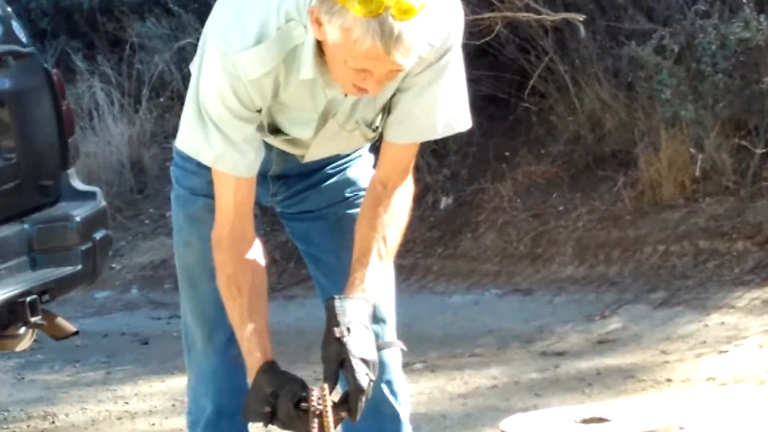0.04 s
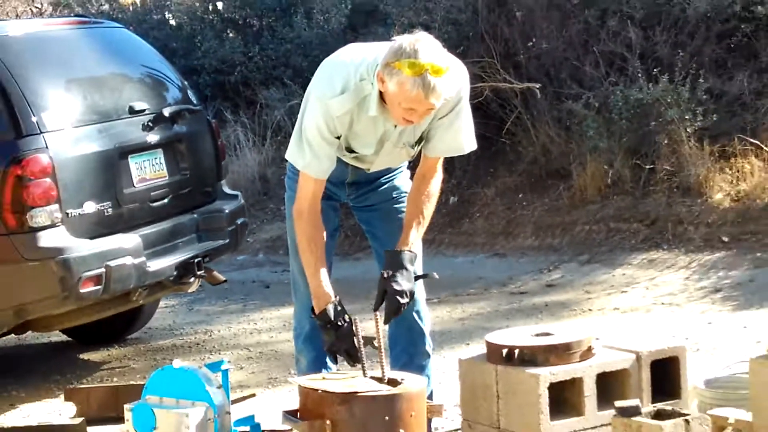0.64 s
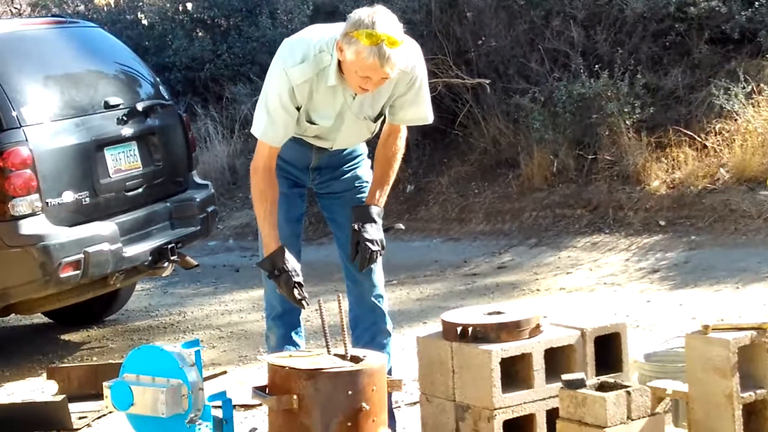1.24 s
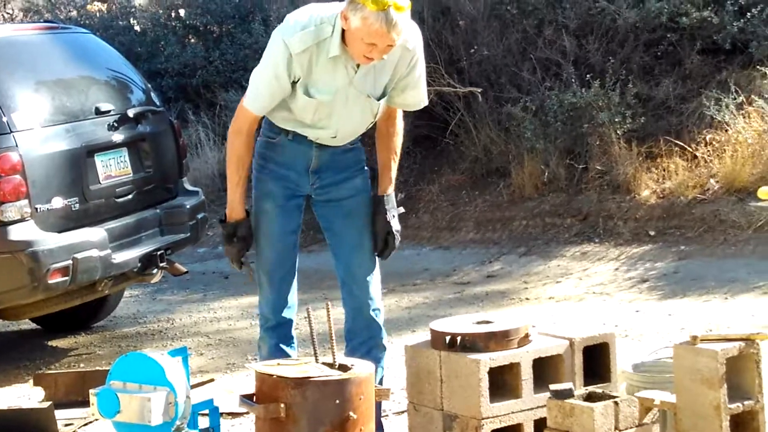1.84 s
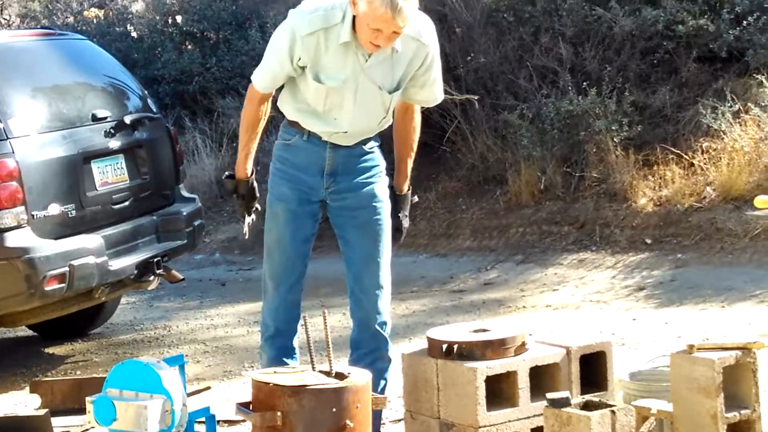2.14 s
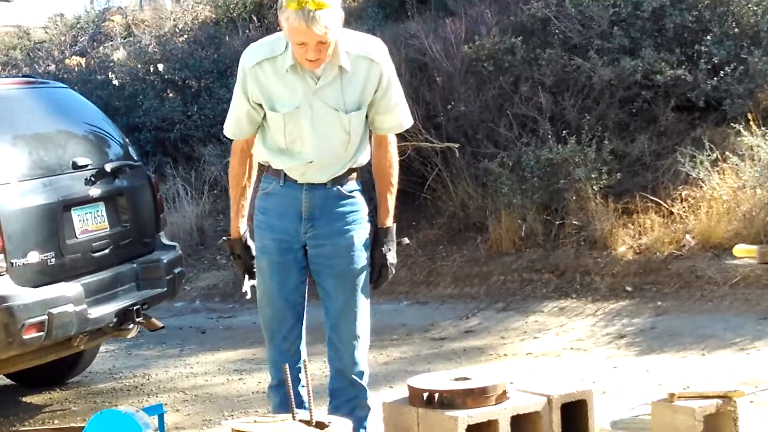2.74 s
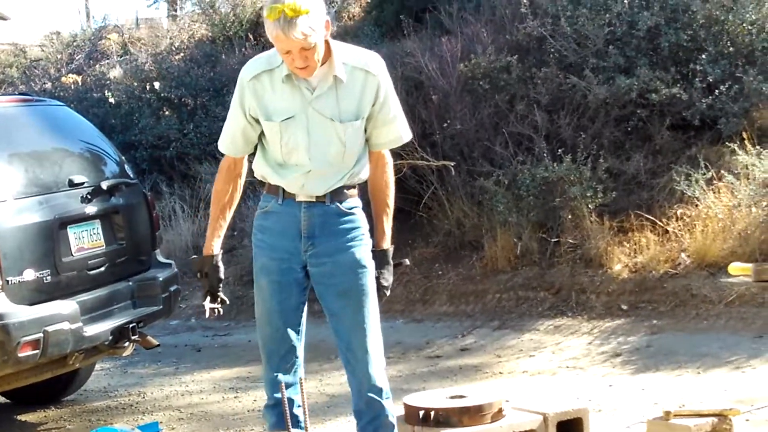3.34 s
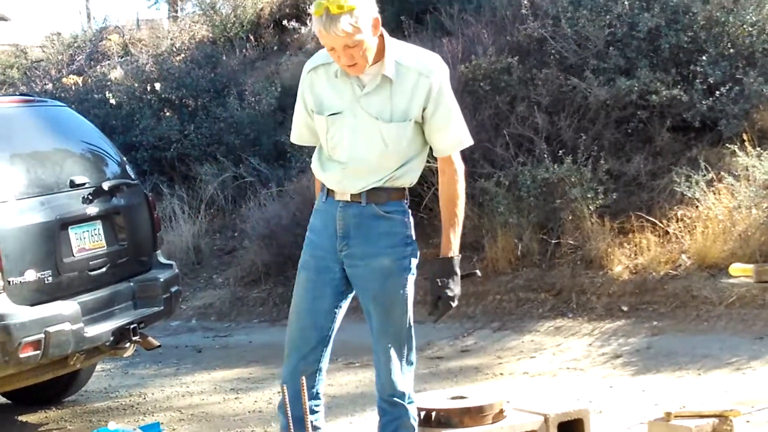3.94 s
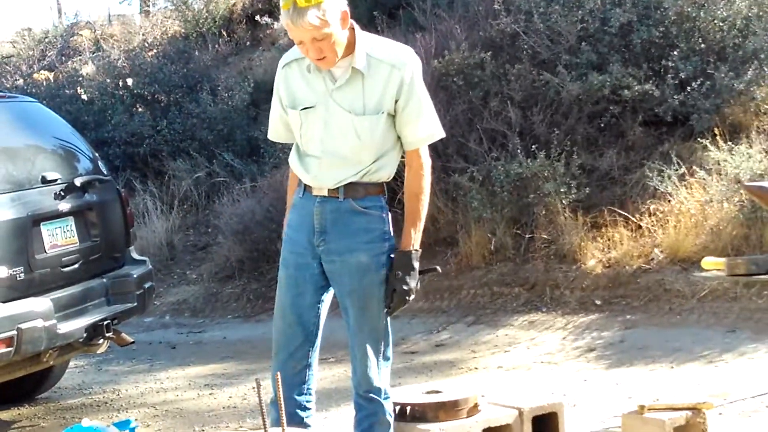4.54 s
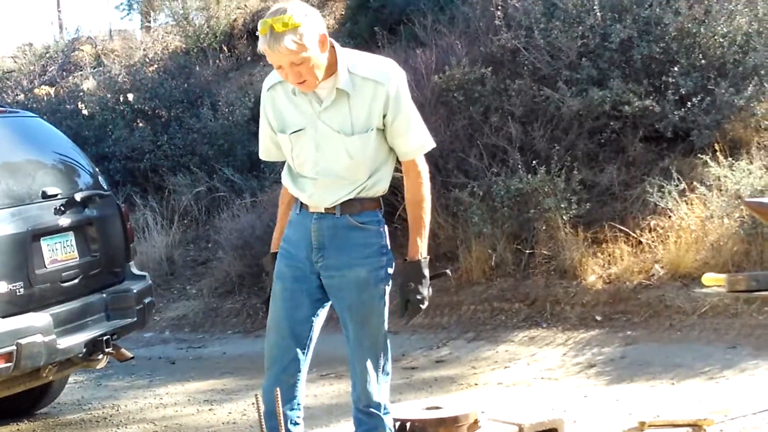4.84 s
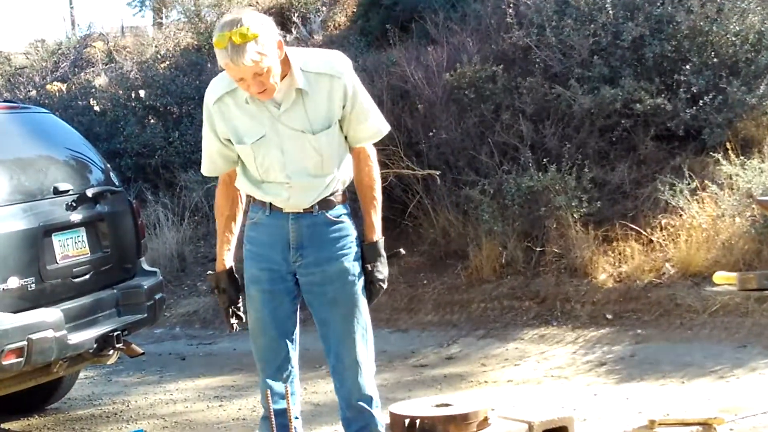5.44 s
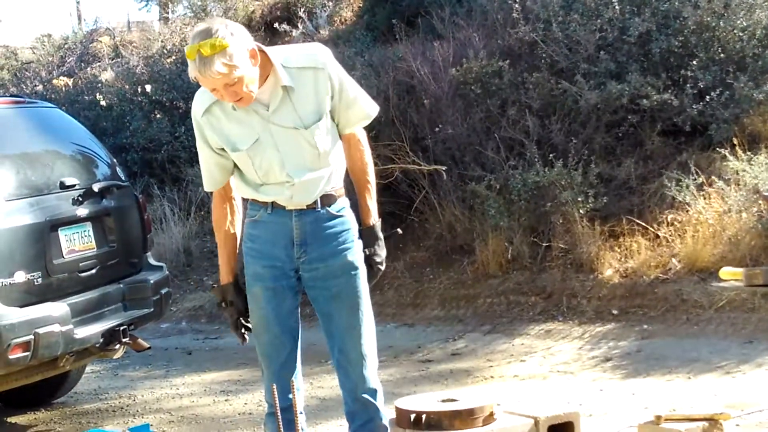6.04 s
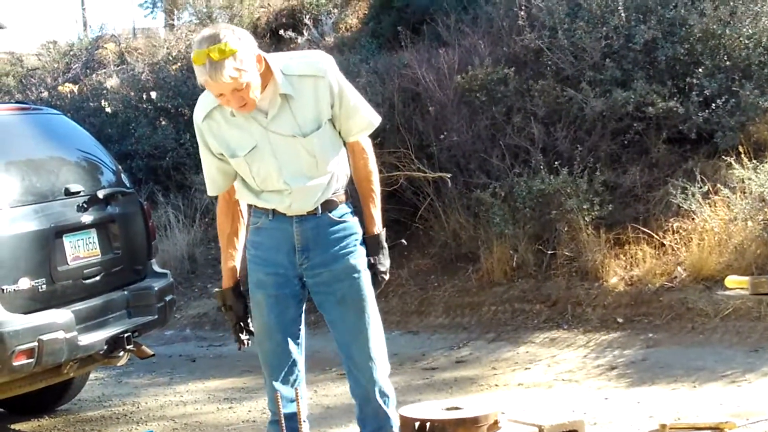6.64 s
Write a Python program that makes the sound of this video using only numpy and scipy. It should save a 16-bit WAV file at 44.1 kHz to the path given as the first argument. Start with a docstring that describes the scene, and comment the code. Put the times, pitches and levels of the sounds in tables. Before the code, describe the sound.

A low, hollow roar of forced flame comes from a small steel furnace and holds steady from start to finish. It flutters irregularly, with a deep rumble below and a softer, breathy rush of gas above. Behind it are a thin hiss that throbs slowly with the blower and a faint, rapid rattle. The microphone stands a few metres away in the open air, with no echo.

```python
"""A blower-fed burner roars in a small steel-drum furnace, outdoors, a few metres away.
Turbulent puffs of flame ring the drum and its air pipe over a deep rumble, while gas rushes through
the lid opening and hisses in spurts. The blower throbs slowly, and a loose part on it ticks once per
shaft turn. Two closely spaced microphone ports give the stereo image."""
import sys
import numpy as np
from scipy import signal
from scipy.fft import rfft, irfft
from scipy.io import wavfile
from scipy.ndimage import uniform_filter1d, map_coordinates

SR = 44100
rng = np.random.default_rng(int(sys.argv[2]) if len(sys.argv) > 2 else 0)


def file_out(sig):
    """Save sig as 16-bit WAV at sys.argv[1]."""
    # one column per channel
    cols = np.atleast_2d(sig).T
    # limit, then scale
    lim = np.clip(cols, -1, 1)
    pcm = np.round(lim * 32767).astype(np.int16)
    wavfile.write(sys.argv[1], SR, pcm)


N = 295470
TIME = np.arange(N) / SR
FREQ = np.maximum(np.arange(N // 2 + 1) * SR / N, 1)
SHAFT_HZ = 29.368
THROB_HZ, THROB_CREST_S = 2.555, .07  # the blower's load

# strength of the fire: t/s, roar level/dB, rush level/dB
FIRE = [(0.0, -21.5, -35.5), (0.06, -26.0, -39), (0.12, -21, -34.5), (0.18, -24, -35.5), (0.26, -24.5, -38),
        (0.46, -23.5, -36), (0.58, -23, -39), (0.7, -21, -34), (0.8, -21, -35.5), (0.9, -24.5, -38.5),
        (0.96, -22.5, -36.5), (1.0, -21.0, -37), (1.22, -24.5, -37), (1.26, -20, -33.5), (1.34, -24.0, -39),
        (1.42, -22.5, -36), (1.6, -22.5, -36.5), (1.94, -25.5, -39.5), (2.24, -22, -36.5),
        (2.34, -27.0, -38), (2.48, -21.5, -34), (2.74, -24.5, -41), (2.8, -22, -38.5), (2.84, -26.5, -39),
        (2.94, -21, -36.5), (2.98, -25.5, -38), (3.04, -24, -38.5), (3.1, -27, -44), (3.22, -26.5, -40.5),
        (3.37, -20.5, -37.5), (3.41, -24, -42), (3.47, -24.5, -35.5), (3.51, -25, -40.5),
        (3.59, -25, -37.5), (3.63, -25.0, -40.0), (3.75, -22, -36), (3.81, -27, -43), (3.89, -27.5, -43),
        (4.03, -24.0, -40.5), (4.21, -26.0, -42.5), (4.25, -24, -39.5), (4.35, -22, -39.5),
        (4.39, -26.5, -37.5), (4.47, -25.5, -40), (4.59, -20.5, -38), (4.63, -25.5, -35.5),
        (4.67, -22.5, -38.0), (4.85, -26, -41), (4.93, -20.5, -35.5), (4.97, -27, -38.5),
        (5.03, -25, -37.5), (5.11, -23, -41.0), (5.17, -25, -37.0), (5.23, -26.5, -40.5),
        (5.55, -22.5, -38.5), (5.59, -27, -40.5), (5.69, -21, -39), (5.77, -24, -35.5), (5.93, -23, -40.5),
        (6.27, -27.0, -38.5), (6.31, -21, -38.5), (6.37, -24.5, -39.0), (6.53, -20.5, -36.5),
        (6.57, -25.5, -43), (6.65, -21, -39.5), (6.7, -26.5, -43.0)]


def undb(db):
    """Decibels to gain."""
    return 10 ** (np.asarray(db) / 20)


def unit(x):
    """Scale to rms 1."""
    return x / np.sqrt(np.mean(x ** 2))


def curve(table):
    """One envelope per value column of a time table."""
    s, *columns = np.transpose(table)
    return [np.interp(TIME, s, c) for c in columns]


def across(points):
    """Breakpoints joined on a log-frequency axis."""
    hz, value = np.transpose(points)
    return np.interp(np.log(FREQ), np.log(hz), value)


def walk(rate):
    """Smooth random modulation, rms 1, moving about rate times a second."""
    return unit(irfft(rfft(rng.standard_normal(N)) * np.exp(-(FREQ / rate) ** 2), N))


def swing(hz, crest_s):
    """A cosine LFO."""
    return np.cos(2 * np.pi * hz * (TIME - crest_s))


def ports(shared, diffuse):
    """A shared and a diffuse spectrum reach two microphone ports: stereo at rms 1."""
    # likeness of the ports: f/Hz, coherence/0-1
    coherence = [(60, .85), (350, .89), (620, .7), (850, .94), (1450, .94), (1750, .35), (2050, .78),
                 (2550, .92), (3200, .6), (3700, .8), (5000, .72), (8500, .68), (9500, .35), (15000, .28)]
    # pan: f/Hz, left minus right/dB
    balance = [(30, 1), (70, .4), (200, 1), (380, -.8), (700, 1.8), (1000, -.5), (1400, -5), (2200, -6),
               (2900, -3), (3500, -5), (5000, -3), (8100, -2), (12000, -6), (15000, -7)]
    # phase between the ports: f/Hz, left lead/rad
    phase = [(20, 0), (600, .25), (1000, 0), (1520, -.1), (1750, 1), (2000, 1.9), (2400, 3), (3000, 1.9),
             (3500, -.1), (3900, -.6), (5500, -4), (5900, -6.2), (6600, -6.5), (7000, -9.2), (7600, -9.6),
             (8300, -12.4), (8800, -12.9), (15000, -27)]
    alike = np.clip(across(coherence), 0, 1)
    side = np.array([[1], [-1]])
    pair = np.sqrt(1 + alike) * shared + side * np.sqrt(1 - alike) * diffuse
    pair = pair * undb(side * across(balance) / 2)
    pair[0] *= np.exp(1j * across(phase))
    return unit(irfft(pair, N))


def turbulence(puff_db, response):
    """Eddy noise, stronger in each puff, excites a response."""
    eddies = rng.standard_normal((2, N)) * undb(puff_db)
    return ports(*(rfft(eddies) * response))


def furnace(colour):
    """Minimum-phase response: the furnace's air resonances on top of a broad EQ curve."""
    # air modes of drum and pipe: f/Hz, width/Hz, boost/dB
    drum = [(61.4, 6.5, 6), (86, 3.4, 5.5), (101.8, 9.5, 5), (123.3, 5.5, -1.5), (138, 5.1, 9),
            (156.8, 2.4, 7), (172.6, 10.5, 9.5), (209, 9, 5.5), (245.4, 15.6, 5), (266.6, 4.7, 5),
            (288.6, 6.2, 2.5), (326.8, 6, 7.5), (338.6, 4.1, 6), (373.3, 6.1, 11), (400.3, 8.7, 7.5),
            (449.8, 9.1, 13.5), (470.5, 6.8, 9), (525.2, 6.9, 10), (532.5, 4.9, 13), (581.7, 13.5, 7.5),
            (603, 11, 7.5), (650, 18, 6.5)]
    # cross modes of the lid opening: f/Hz, width/Hz, boost/dB
    opening = [(700.5, 9.3, 6), (757.7, 5.9, 8), (794.5, 13.4, 7), (857, 10, 5.5), (880, 15, 5.5),
               (947, 7, 7), (1032, 8, 5.5), (1067, 6.1, 4.5), (1119, 10.5, 5), (1221, 16, 5),
               (1311, 13, 6.5), (1340, 8.7, 7), (1457.4, 18.5, 12.5), (1510, 16.9, 8), (1580, 29, 9),
               (1690, 54, 5), (1698, 23, 11.5), (1762, 32, 9.5), (1917, 33, 5), (1960, 19, 8),
               (1970, 17.6, 12), (2023, 25, 10), (2097, 18, 9.5), (2123, 19, 8.5), (2246, 20, 8.5)]
    # notches where neighbouring modes cancel: f/Hz, width/Hz, gain/dB
    notches = [(93.7, 11.6, -11.5), (158.3, 4.6, -8.5), (437.5, 10.2, -9)]

    def bell(hz, width):
        return 1 / (1 + (2 * (FREQ - hz) / width) ** 2)
    power = 1 + sum(undb(db) ** 2 * bell(hz, width) for hz, width, db in [*drum, *opening])
    for hz, width, db in notches:
        power = power * (1 - (1 - undb(db) ** 2) * bell(hz, width))
    cepstrum = irfft(np.log(undb(across(colour)) * np.sqrt(power)), N)
    return np.exp(rfft(2 * cepstrum * (np.arange(N) < N // 2)))


def steady(x, span_s):
    """Level out swells longer than span_s, ready for an envelope."""
    size = int(span_s * SR)
    power = np.mean(x ** 2, axis=0)
    return x / np.sqrt(uniform_filter1d(uniform_filter1d(power, size), size))


def waver(x, lag_s=.00014, rate=4):
    """Gas of changing heat makes the resonances drift slightly in pitch."""
    place = (TIME + lag_s * walk(rate)) * SR
    return np.array([map_coordinates(side, [place], order=3, mode="grid-wrap") for side in x])


def swell_bands(x):
    """Bands of the roar grow louder and fade, some briefly, some over seconds."""
    # timed EQ boosts: t/s, length/s, f/Hz, width/Hz, boost/dB
    boosts = [(.3, 1.9, 301, 80, 6), (0.794, 0.25, 372, 30, 9.5), (1.265, 0.11, 360, 70, 6),
              (1.5, 3, 2130, 500, 2.5), (2.6, 3.1, 297, 70, 3.5), (3.1, 1.5, 1548, 50, 7.5),
              (4.8, 1.1, 139, 22, 3.5), (4.85, 1.3, 797, 100, 5.5), (4.34, 0.39, 1440, 50, 4.5),
              (4.9, 3.4, 496, 70, 2), (5.55, 0.43, 1506, 50, 11), (6.35, 1.3, 1455, 50, 4),
              (6.443, 0.44, 200, 60, 3.5), (5.45, 0.66, 1110, 200, 2), (.5, 2, 560, 130, 3),
              (1, 0.74, 1550, 220, 5.5), (2.465, 0.12, 585, 180, 7), (3.416, 0.35, 365, 40, 4.5),
              (6.5, 0.23, 400, 160, 2.5)]
    spectrum = rfft(x)
    for s, length, hz, width, db in boosts:
        band = irfft(spectrum * np.exp(-(2 * (FREQ - hz) / width) ** 2), N)
        x = x + band * (undb(db * np.exp(-(2 * (TIME - s) / length) ** 2)) - 1)
    return x


def rumble(puffs, puff_db=.67, trim_db=-.26):
    """The low end: puffs of flame stir the drum's deepest modes."""
    # rumble envelope: t/s, level/dB
    envelope = [(0.0, -31), (0.1, -28.0), (0.34, -30), (0.42, -26), (0.56, -31.5), (0.8, -27),
                (0.88, -33.0), (1.04, -25), (1.18, -31.5), (1.26, -26), (1.32, -31.5), (1.42, -24),
                (1.48, -29.5), (1.6, -25), (1.84, -34), (2.04, -25.5), (2.58, -29), (2.66, -26.0),
                (2.72, -28.5), (3.06, -28), (3.12, -32.5), (3.39, -26.5), (3.53, -32), (3.77, -26.5),
                (3.81, -32), (3.95, -32.5), (4.05, -29.5), (4.21, -31.5), (4.27, -28.5), (4.61, -29),
                (4.77, -28.5), (4.83, -30.5), (5.17, -27.5), (5.23, -32.5), (5.65, -29), (5.95, -30.5),
                (5.99, -25.5), (6.19, -33.0), (6.41, -27.5), (6.7, -30.0)]
    # rumble EQ: f/Hz, gain/dB
    colour = [(20, -36), (38, -32), (60, -11), (105, 1), (220, -2), (310, -18.5), (500, -30.5), (3000, -89)]
    lows = steady(turbulence(puff_db * puffs, furnace(colour)), span_s=.11)
    return swell_bands(lows * undb(curve(envelope)[0] + trim_db + accents() / 2))


def roar(puffs, puff_db=.67, trim_db=.5):
    """The body: puffs of flame ring drum and pipe in the low mids."""
    # roar EQ: f/Hz, gain/dB
    colour = [(20, -53.5), (120, -25), (220, -9), (310, -1.4), (400, -0.96), (500, -8.5), (600, -14.5),
              (700, -21.5), (950, -29), (1500, -47), (3000, -63)]
    level_db, _ = curve(FIRE)
    body = swell_bands(waver(turbulence(puff_db * puffs, furnace(colour))))
    return steady(body, span_s=.087) * undb(level_db + trim_db + accents())


def rush(puffs, puff_db=1.5, trim_db=1.41):
    """The breathy mids: gas gusts through the lid opening."""
    # rush EQ: f/Hz, gain/dB
    colour = [(300, -12), (700, -1.5), (950, 0.5), (1300, -1), (1550, -3), (1850, -4.5), (2100, -3.5),
              (2500, -7.5), (2900, -12.5), (3600, -21.5), (5000, -32), (12000, -36.5)]
    _, level_db = curve(FIRE)
    breath = swell_bands(turbulence(rush_puff := puff_db * puffs, furnace(colour)))
    return steady(breath, span_s=.17) * undb(level_db + trim_db + accents() / 2)


def gas_hiss(sizzle_trim_db=7, hiss_trim_db=5, flutter_db=1.5, grain_db=1.0):
    """Gas sizzles and hisses with the blower's throb; the sizzle also pulses on each shaft turn."""
    # gas flow: t/s, sizzle level/dB, hiss level/dB
    flow = [(0.0, -61, -59.5), (0.34, -67.5, -67), (0.84, -61, -63), (1.16, -68, -63.5), (1.24, -67, -56.0),
            (1.32, -64, -59.0), (1.62, -59, -59.5), (1.82, -60.5, -67.5), (1.92, -57.5, -62.5),
            (2.08, -61.5, -63.0), (2.62, -58, -63.5), (2.68, -62, -68.0), (2.78, -61, -65),
            (3.02, -64.5, -69), (3.49, -62.5, -68.5), (3.71, -61.5, -64), (3.79, -64, -69.5),
            (4.01, -66.5, -68.5), (4.23, -66.5, -72), (4.27, -61, -64.5), (4.57, -68, -65),
            (4.73, -61, -62.5), (4.83, -62.5, -65.5), (5.03, -63, -62), (5.13, -65, -67.5),
            (5.79, -62, -63), (5.87, -62.5, -60.5), (6.15, -62, -67.0), (6.43, -62.5, -64.0),
            (6.7, -62.5, -64)]
    # sizzle EQ: f/Hz, gain/dB
    sizzle_colour = [(2000, -24), (3200, 6.5), (4100, 3), (5000, -5.5), (5800, -9.5), (7500, -26),
                     (12000, -31)]
    # brighter hiss EQ: f/Hz, gain/dB
    hiss_colour = [(2000, -35), (5000, 4), (6100, -2.5), (7300, 1.5), (8500, 2.5), (10000, -2), (12200, -3),
                   (13200, -5), (14700, -7), (16000, -21)]
    throb = swing(THROB_HZ, THROB_CREST_S)
    sizzle_db, hiss_db = curve(flow)
    sizzle_db += sizzle_trim_db + 1.35 * throb + .9 * swing(SHAFT_HZ, crest_s=.017)
    hiss_db += hiss_trim_db + .5 * throb
    gas = 0
    for colour, db in (sizzle_colour, sizzle_db), (hiss_colour, hiss_db):
        eddies_db = flutter_db * walk(rate=45) + grain_db * walk(rate=1500)
        gas = gas + turbulence(eddies_db, undb(across(colour))) * undb(db)
    return gas


def rattle(trim_db=-7, throb_db=.6, housing_hz=3480, half_width_hz=380):
    """Once per shaft turn a loose part strikes, rings and bounces twice; harder under load."""
    # modes of the loose part: f/Hz, t60/s, level/dB
    modes = [(3250, .005, -9), (3470, .017, 0), (3490, .05, -15), (3760, .005, -10)]
    # tick envelope: t/s, level/dB
    envelope = [(0.0, -49), (0.32, -54), (0.4, -54), (0.56, -54.5), (0.78, -46.5), (0.9, -56),
                (1.14, -57.5), (1.58, -48.5), (1.88, -56), (2.0, -46.5), (2.16, -51.5), (2.46, -48.0),
                (2.6, -65), (2.72, -49), (2.88, -50.5), (3.0, -56.5), (3.37, -53), (3.43, -58.5),
                (3.49, -52.5), (3.65, -49), (3.77, -60), (3.91, -50.5), (4.21, -54.0), (4.41, -46.5),
                (4.51, -54), (4.73, -49.5), (4.91, -52.5), (5.17, -52.5), (5.33, -57.5), (5.59, -49),
                (5.75, -57), (5.87, -50), (6.13, -55), (6.35, -47), (6.57, -56), (6.7, -45)]
    first_s, skip_at_s, skip_s, jitter_s = .0316, 1.42, .0109, .0003
    bounce_s, bounce_db, scatter_db = .008, -11.5, 1.4
    turns = np.arange(int(N / SR * SHAFT_HZ))
    force, gap, late = rng.standard_normal((3, len(turns), 3))
    hit = np.arange(3)
    s = first_s + turns[:, None] / SHAFT_HZ
    s = s + skip_s * (s > skip_at_s)  # the beat slips once and stays late
    s = s + jitter_s * late + hit * bounce_s * (1 + np.tanh(gap) / 2)
    size = undb(scatter_db * force + bounce_db * np.sqrt(hit))
    blows = np.bincount((s * SR).astype(int).ravel() % N, size.ravel(), N)
    ring = sum(undb(db - 60 * TIME / t60) * np.sin(2 * np.pi * hz * TIME) for hz, t60, db in modes)
    # the housing radiates only one band, which rounds off each click
    housing = 1 / (1 + ((FREQ - housing_hz) / half_width_hz) ** 4)
    strike_db = curve(envelope)[0] + trim_db + throb_db * swing(THROB_HZ, THROB_CREST_S)
    return ports(rfft(blows) * rfft(ring) * housing, diffuse=0) * undb(strike_db)


def accents():
    """Brief accents in the roar's loudness: a boost envelope in dB."""
    # level bumps: t/s, length/s, roar boost/dB
    bumps = [(1.6, 0.035, 2), (1.77, 0.012, 2.5), (2.236, 0.011, 6), (2.66, 0.012, 4), (2.799, 0.014, 4),
             (3.038, 0.02, 4), (4.755, .022, 5), (5.021, 0.022, 5), (5.175, 0.026, 4.5), (5.842, 0.019, 7),
             (5.93, .008, 8)]
    return sum(db * np.exp(-(2 * (TIME - s) / length) ** 2) for s, length, db in bumps)


def scene():
    """Fire, gas and blower, with no echo; the same quick puffs drive all three fire layers."""
    puffs = walk(rate=55)
    return rumble(puffs) + roar(puffs) + rush(puffs) + gas_hiss() + rattle()


def record(dry, top_hz=15400, fade_s=.004):
    """Click-free fades at both ends and a steep high cut."""
    fade = np.minimum(np.minimum(TIME, TIME[::-1]) / fade_s, 1)
    return signal.sosfilt(signal.ellip(10, .2, 80, top_hz, fs=SR, output="sos"), dry * fade)


dry = scene()
out = record(dry)
file_out(out)
```